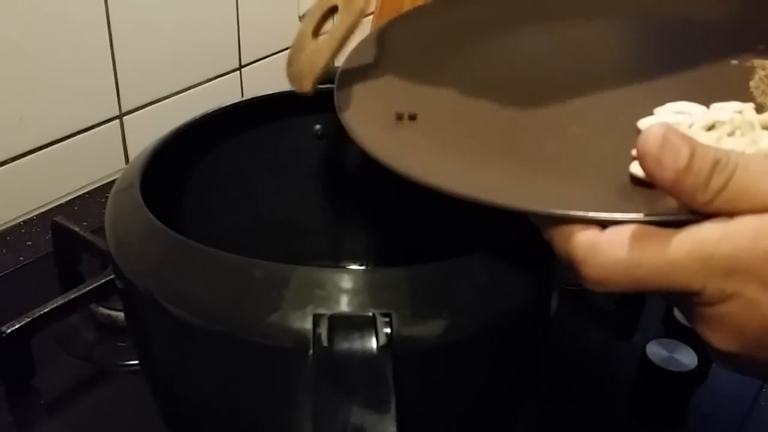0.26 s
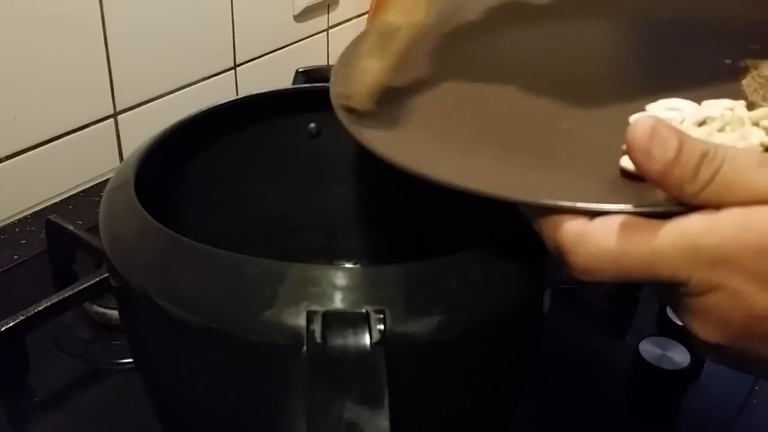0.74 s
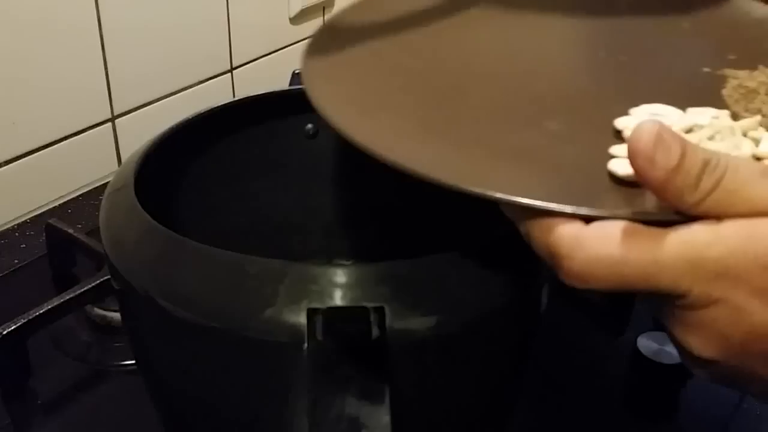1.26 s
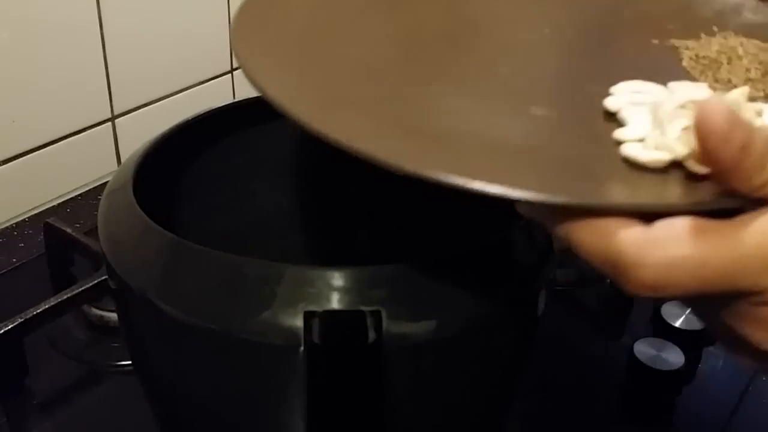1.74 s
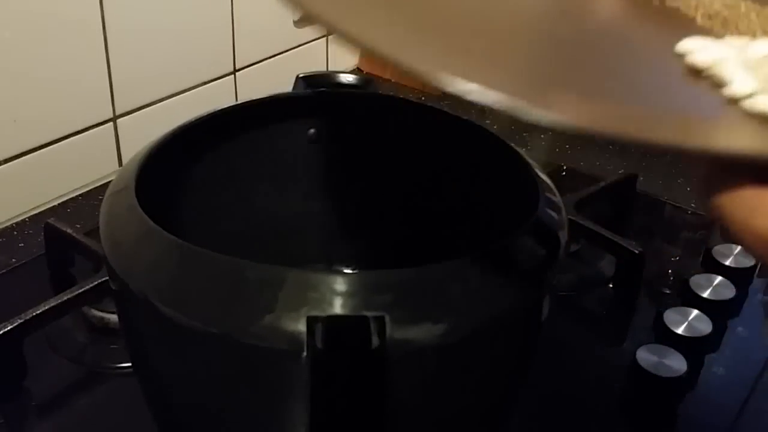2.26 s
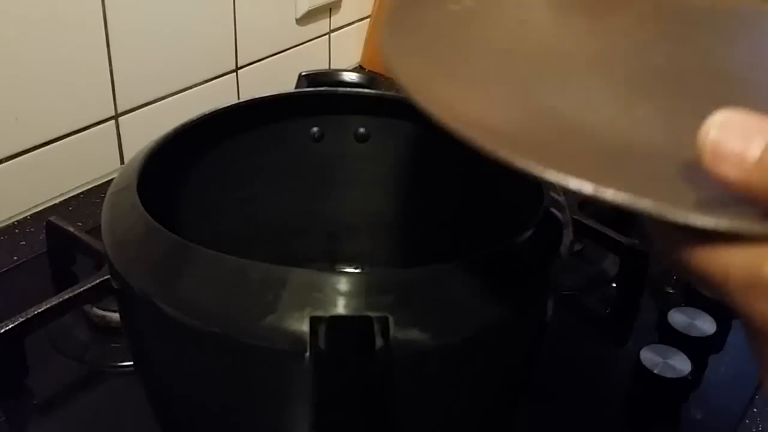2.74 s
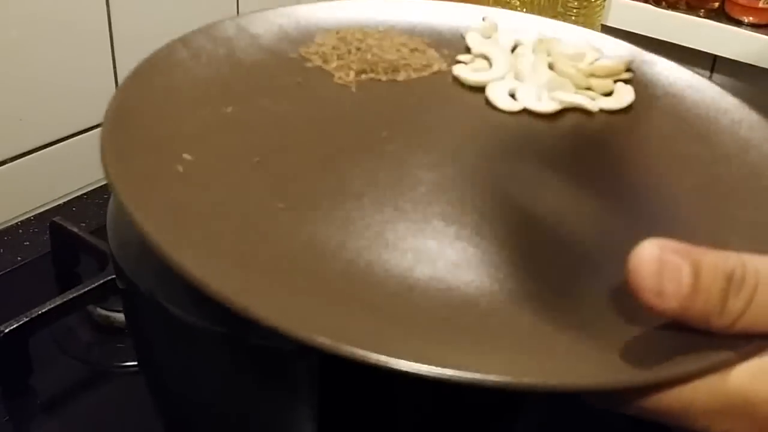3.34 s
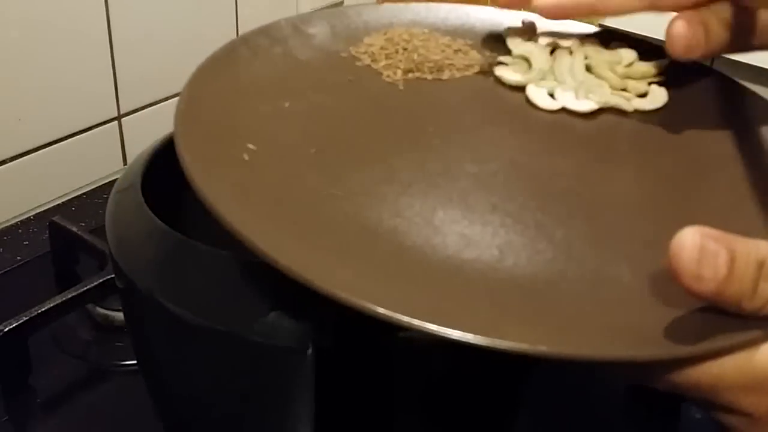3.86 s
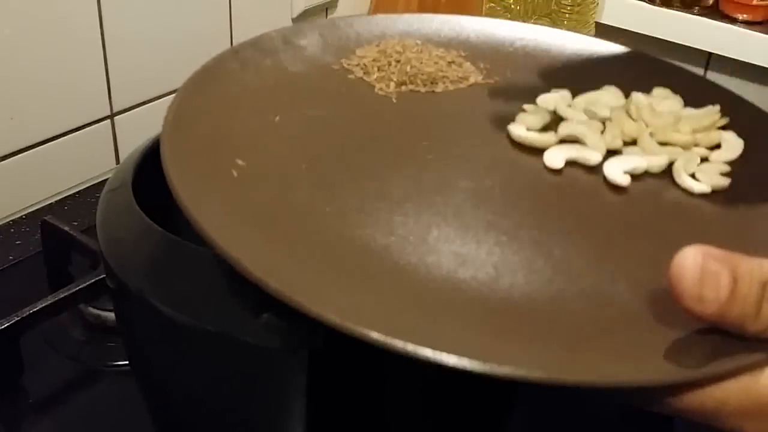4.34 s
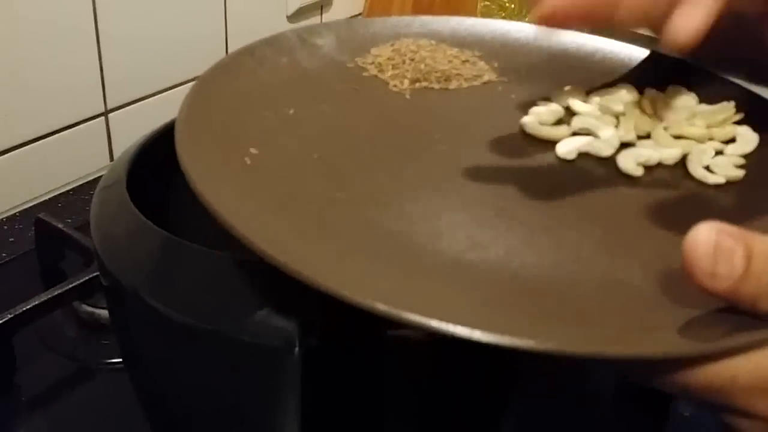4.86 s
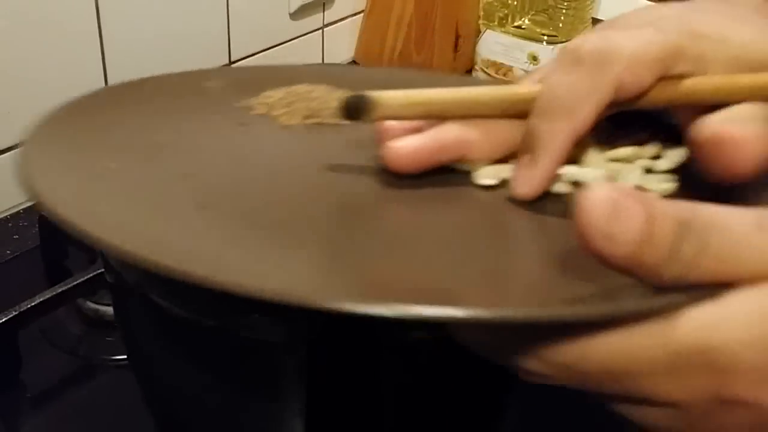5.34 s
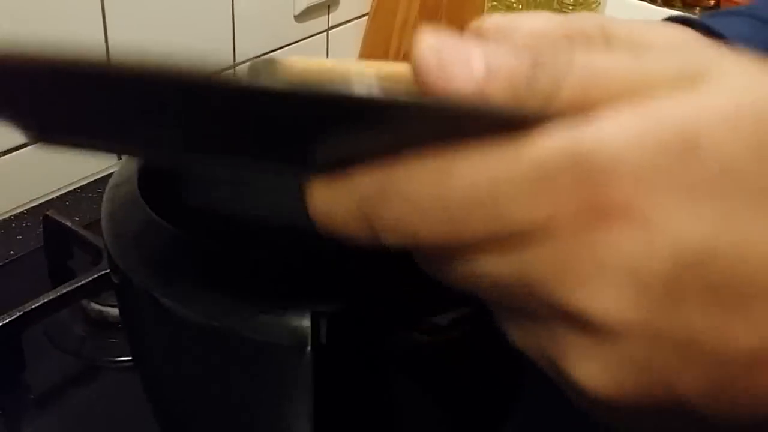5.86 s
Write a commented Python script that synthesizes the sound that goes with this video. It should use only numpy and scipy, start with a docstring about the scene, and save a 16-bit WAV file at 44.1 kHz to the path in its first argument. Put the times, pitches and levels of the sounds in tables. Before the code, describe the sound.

A soft fizz of frying oil with small pops and spits, light knocks on a stoneware plate and a faint gas burner.

```python
"""Whole spices fry gently in hot oil in a deep metal pot on a gas stove, in a tiled kitchen.
Tiny bubbles merge into a fine fizz; seeds pop and let out short jets of steam that ring in the pot.
A stoneware plate held above it is tapped and scraped by a wooden spoon and by nuts pushed across it.
Underneath lie the soft roar of the burner and a low hum."""
import sys
import numpy as np
from scipy import signal
from scipy.fft import rfft, irfft
from scipy.io import wavfile
from scipy.ndimage import uniform_filter1d

SR = 44100
rng = np.random.default_rng(int(sys.argv[2]) if len(sys.argv) > 2 else 0)


def store_wav(level_fs):
    """Save 16-bit WAV to argv[1]."""
    pcm = np.round(np.clip(np.atleast_2d(level_fs), -1, 1) * 32767)
    wavfile.write(sys.argv[1], SR, pcm.T.astype(np.int16))


N = 269010

# resonances of the air in the pot: f/Hz, width/Hz, lift/dB
POT_RESONANCES = [(438, 28, 6), (975, 49, 8.5), (1144.2, 37, 14), (1340.6, 23.8, 16), (1476, 69, 11),
                  (1570.3, 39, 15.5), (3634, 85, 5), (5000, 420, 2), (7820, 240, 5), (9240, 100, 3)]


def gain_of(db):
    return 10 ** (np.asarray(db) / 20)


def unit_rms(x):
    return x / np.sqrt(np.mean(x ** 2) + 1e-20)


def curve_at(points, hz):
    """Reads a curve along a logarithmic frequency axis."""
    f, value = np.transpose(points)
    return np.interp(np.log(hz + 1), np.log(f + 1), value)


def add(mix, start, sound):
    part = mix[..., round(start * SR):][..., :sound.shape[-1]]
    part += sound[..., :part.shape[-1]]


def high_pass(x, hz):
    return signal.sosfilt(signal.butter(4, hz, "high", fs=SR, output="sos"), x)


def resonate(x, hz, width):
    """A resonance that can glide: shifts hz down to zero, smooths with one pole, shifts back."""
    turn = np.exp(2j * np.pi * np.cumsum(hz * np.ones(x.shape[-1])) / SR)
    r = np.exp(-np.pi * width / SR)
    return 2 * (turn * signal.lfilter([1 - r], [1, -r], x / turn)).real


def ring(force, hz, t60):
    """One mode: a click of height 1 gives a dying sine of height 1."""
    r, turn = gain_of(-60 / t60 / SR), 2 * np.pi * hz / SR
    return signal.lfilter([0, r * np.sin(turn)], [1, -2 * r * np.cos(turn), r * r], force)


def swell(rise, hold, t60):
    """Time axis and an envelope that rises in a curve, holds, then dies away."""
    t = np.arange(SR * 2 // 5) / SR
    return t, np.minimum(t / rise, 1) ** 1.1 * gain_of(-60 * np.maximum(t - rise - hold, 0) / t60)


def clicks(size, per_s, spread_db):
    """Random clicks of either sign, most small and a few large."""
    chance, sign, height = rng.random((size, 3)).T
    return (chance < per_s / SR) * np.sign(sign - .5) * gain_of(-spread_db * np.log(height + 0.0033))


def hiss(colour, patchy_db, flicker_db):
    """A stereo noise bed coloured by the pot, with drifting patches and a flicker across all pitches."""
    # likeness of left and right: f/Hz, correlation
    stereo_likeness = [(60, 0.7), (300, 0.73), (900, 0.36), (1150, 0.58), (1300, -0.53), (1600, -0.45),
                       (1800, -0.38), (2300, 0.65), (2800, -0.05)]
    frames, hz = N // 256 + 5, np.fft.rfftfreq(1024, 1 / SR)
    a, b, c, d, patches = rng.standard_normal((frames, 513, 5)).T
    patches = unit_rms(uniform_filter1d(uniform_filter1d(patches, size=14, axis=0), size=10, axis=1))
    flicker = unit_rms(uniform_filter1d(rng.standard_normal(frames), size=6))
    pot_db = sum(db / (1 + (2 * (hz - f) / width) ** 2) for f, width, db in POT_RESONANCES)
    likeness = np.clip(curve_at(stereo_likeness, hz), -1, 1)[:, None]
    left = a + 1j * b
    right = likeness * left + np.sqrt(1 - likeness ** 2) * (c + 1j * d)
    level_db = (curve_at(colour, hz) + pot_db)[:, None] + patchy_db * patches + flicker_db * flicker
    spectra = np.array([left, right]) * gain_of(level_db)
    return unit_rms(signal.istft(spectra, nperseg=1024, noverlap=768)[1][:, :N])


def fizz():
    """Countless tiny bubbles merge into a hiss that swells with the frying; its treble comes and goes."""
    # spectrum of the fizz: f/Hz, level/dB
    colour = [(1060, -20), (1800, -5), (1900, -11), (2020, -9.5), (2810, -10), (3670, -6), (4470, -7),
              (4900, -5.5), (5500, -1.5), (6260, -6), (8640, -11), (9390, -12.5), (11200, -16),
              (14600, -47), (22000, -120)]
    # swell of the frying: t/s, level/dB
    levels = [(0.0, -51.5), (0.49, -52), (0.61, -52.5), (1.19, -53), (1.51, -54.5), (1.75, -53.5),
              (1.99, -49), (2.26, -52.5), (3.09, -52.5), (3.28, -54.5), (3.91, -53), (4.15, -47.5),
              (4.3, -53), (5.18, -51), (5.28, -49), (5.67, -51.5), (6.1, -47.5)]
    # brightness above 5 kHz: t/s, tilt/(dB per octave)
    tilts = [(0, -3), (.61, -1.5), (1.5, 1), (1.99, -2), (2.3, -1.5), (3.3, 0), (4.15, -3.5), (4.4, 0.5),
             (5.15, -3), (5.4, -1), (6.1, 2.5)]
    hz, t, spectra = signal.stft(hiss(colour, patchy_db=1.3, flicker_db=.4), SR, nperseg=512)
    octaves = np.log2(np.maximum(hz / 5000, 1))[:, None]
    level_db = np.interp(t, *np.transpose(levels))
    treble_db = octaves * np.interp(t, *np.transpose(tilts))
    return signal.istft(spectra * gain_of(level_db + treble_db), SR, nperseg=512)[1][:, :N]


def burner():
    """The gas flame gives a soft, flickering roar."""
    # spectrum of the roar: f/Hz, level/dB
    colour = [(76, -23), (130, -3), (290, -3), (387, -8.5), (473, -6.5), (578, -14.5), (752, -2.5),
              (885, -5.5), (1440, -4), (1900, -22.5), (2600, -17), (3380, -61), (5720, -120)]
    return gain_of(-59) * hiss(colour, patchy_db=1.63, flicker_db=1.0)


def hum():
    """A low, unsteady hum over a deep rumble of drifting air, nearly alike in both ears."""
    shared, left, right = rng.standard_normal((3, N))
    air = shared + 0.48 * np.array([left, right])
    tone = resonate(resonate(air, hz=105, width=20), hz=105, width=20)
    rumble = resonate(resonate(air, hz=58, width=45), hz=58, width=45)
    return gain_of(-71) * unit_rms(tone) + gain_of(-74.5) * unit_rms(rumble)


def bubbles(size, hz, width, per_s):
    """A crowd of bursting bubbles rings around one pitch; each ear hears mostly its own bubbles, with a few
    shared by both."""
    crowd = np.array([clicks(size, per_s, spread_db=3.) for _ in range(3)])
    ears = crowd[:2] + 0.27 * crowd[2]
    for _ in range(3):
        ears = resonate(ears, hz, width)
    return unit_rms(ears)


def spits(per_s=12, level_db=-63, t60=.15):
    """Small pockets of steam break the surface at random, each a faint, brief hiss at its own pitch."""
    out, t = np.zeros((2, N)), np.arange(3000) / SR
    for when, pitch, size in rng.random((round(per_s * N / SR), 3)):
        envelope = np.minimum(t / .004, 1) * gain_of(level_db + 6 * size - 60 * t / t60)
        add(out, when * N / SR, envelope * bubbles(len(t), 3500 + 6500 * pitch, width=1100, per_s=3200))
    return out


def pops_and_puffs():
    """Seed pops and short puffs of steam: each starts sharply, hisses for a moment and dies away."""
    # seed pops and steam puffs: t/s, level/dB, bubble f/Hz, width/Hz, hold/s, t60/s
    events = [(0.1074, -46.5, 4400, 2100, 0.0037, 0.16), (0.14, -45.5, 9600, 4700, .012, .11),
              (0.5862, -56, 7700, 4700, .006, .09), (0.8299, -37, 5200, 5730, .005, 0.25),
              (0.9668, -49.5, 4740, 4700, .01, 0.14), (1.105, -46, 4660, 2500, .012, .11),
              (1.2468, -52, 4900, 2900, .011, .13), (1.279, -55, 5300, 2900, 0.013, 0.33),
              (1.787, -39, 2680, 1970, 0.013, 0.15), (1.79, -48, 5800, 7000, 0.0078, 0.22),
              (1.8156, -41.5, 7300, 4900, .006, 0.18), (1.82, -57, 2580, 1400, .016, .09),
              (1.9113, -48.5, 4900, 1790, 0.014, 0.1), (1.952, -56, 4900, 1750, 0.024, 0.24),
              (2.022, -57.5, 9500, 2900, 0.043, 0.053), (2.0562, -51.5, 6900, 2300, .01, .12),
              (2.09, -41.5, 8170, 3200, 0.0085, 0.11), (2.2075, -51.5, 9600, 2900, 0.0064, 0.093),
              (2.822, -45, 8350, 3800, 0.012, 0.043), (2.845, -54.5, 9500, 2600, 0.029, 0.091),
              (3.0298, -38, 5050, 1720, 0.018, .04), (3.031, -53.5, 3270, 1520, 0.018, .06),
              (3.058, -49, 4900, 1500, 0.02, 0.11), (4.231, -55.5, 8000, 5900, 0.027, 0.43),
              (4.5626, -29, 4670, 1010, 0.0034, 0.13), (4.563, -39.5, 4230, 6740, 0.0074, 0.26),
              (4.591, -41, 6500, 2900, 0.02, 0.14), (5.151, -49.5, 4660, 900, 0.0088, 0.069),
              (5.283, -54.5, 7900, 1500, 0.011, 0.069)]
    out, t = np.zeros((2, N)), np.arange(12000) / SR
    attack = np.minimum(t / .0007, 1) * (1 + .7 * np.exp(-t / .005))
    for start, db, hz, width, hold, t60 in events:
        envelope = attack * gain_of(db - 60 * np.maximum(t - hold, 0) / t60)
        add(out, start, envelope * bubbles(len(t), hz, width, per_s=3500))
    return high_pass(out, 1800)  # small bubbles radiate no bass


def steam_jets(pitch_lift=.4, settle_s=0.0076, sputter_db=.7):
    """Steam escapes through the oil as a dense, broad spray of bubbles that sputters as it goes."""
    # jets of steam: t/s, rise/s, hold/s, t60/s, level/dB, centre f/Hz, low cut/Hz
    jets = [(0.135, 0.033, .004, 0.21, -35, 5500, 2070), (0.58, .003, 0.02, 0.25, -47.5, 6000, 3370),
            (5.13, 0.0074, 0.083, .1, -45.5, 6400, 3570), (5.239, 0.048, 0.037, 0.27, -52, 8300, 3600),
            (6.002, 0.045, .1, .3, -38, 5800, 3770)]
    out = np.zeros((2, N))
    for start, rise, hold, t60, db, hz, low_cut in jets:
        t, envelope = swell(rise, hold, t60)
        spray = bubbles(len(t), hz, width=10200, per_s=8000)
        glide_hz = hz * (1 + pitch_lift * np.exp(-t / settle_s))  # opens high and settles
        spray = high_pass(spray + .5 * unit_rms(resonate(spray, glide_hz, width=3700)), low_cut)
        sputter = unit_rms(uniform_filter1d(rng.standard_normal(len(t)), size=500))
        add(out, start, gain_of(db + sputter_db * sputter) * envelope * unit_rms(spray))
    return out


def plate():
    """Taps and the grit of scrapes ring the same modes, most those near the pitch of the contact."""
    # stoneware modes, damped by the hand that holds the plate: f/Hz, level/dB, t60/s
    modes = [(300, -6, .1), (447, 1, .14), (640, -5, .04), (810, -6, .05), (1125, -4, .07), (1240, -7, .06),
             (1400, -6, .06), (1940, -15, .06), (1972, -2, .12), (2400, -16, .04), (3255, -9, .05),
             (3305, -8, .07), (4715, 0, .04)]
    # blows of spoon and nuts: t/s, ring/dB, contact f/Hz, spread/octaves, knock/dB
    taps = [(.447, -35, 610, 0.69, -28.5), (0.45, -42, 1420, 0.25, -33), (.451, -33, 3060, 0.24, -47),
            (.455, -36.5, 1960, 0.56, -36), (.463, -49, 1310, 0.4, -31), (0.476, -44, 3060, 0.66, -36),
            (1.788, -42, 437, 0.28, -48), (1.79, -39.5, 1340, .54, -51), (3.954, -35, 3400, .33, -46),
            (3.978, -35, 3360, 0.34, -42), (4.06, -35, 3280, 1, -39), (4.11, -47, 4400, 0.63, -48),
            (4.3, -59, 1500, .39, -41), (4.325, -55, 2360, 0.18, -41), (4.958, -44, 3390, .3, -34.5),
            (4.963, -41, 3230, 0.33, -39.5)]
    # strokes: t/s, rise/s, hold/s, t60/s, grit/dB, contact f/Hz, rasp/dB, rasp f/Hz, rasp width/Hz
    scrapes = [(0.594, 0.025, 0.038, .05, -69, 5200, -47, 2040, 6200),
               (3.86, 0.077, 0.19, .03, -70, 2050, -61, 1260, 700),
               (3.933, .06, 0.166, .03, -69.5, 3460, -53.5, 1200, 503),
               (4.093, 0.045, 0.091, .2, -80, 268, -64, 300, 140)]
    out, t = np.zeros(N), np.arange(2000) / SR
    envelopes = [swell(*row[1:4])[1] for row in scrapes]
    grits = [env * unit_rms(clicks(len(env), per_s=4600, spread_db=6.0)) for env in envelopes]
    for hz, mode_db, t60 in modes:
        force = np.zeros(N)
        for (start, _, _, _, db, contact_hz, *_), grit in zip(scrapes, grits):
            add(force, start, gain_of(db - 12 * np.log2(hz / contact_hz) ** 2) * grit)
        for start, db, contact_hz, spread, _ in taps:
            add(force, start, gain_of([db - 6 * (np.log2(hz / contact_hz) / spread) ** 2]))
        out += gain_of(mode_db) * ring(force, hz, t60)
    for start, _, contact_hz, _, knock_db in taps:  # dry knock: wood and nuts are quickly damped
        add(out, start, gain_of(knock_db - 60 * t / 0.012) * np.sin(2 * np.pi * contact_hz * t))
    for (start, *_, rasp_db, hz, width), envelope in zip(scrapes, envelopes):
        rasp = resonate(resonate(rng.standard_normal(len(envelope)), hz, width), hz, width)
        add(out, start, gain_of(rasp_db) * envelope * unit_rms(rasp))
    return high_pass(out, 222)  # a small plate radiates no bass


def reflections(x, t60, predelay_s):
    """Sparse wall echoes of random sign, different for each channel, dying evenly."""
    echoes, slots = np.zeros((2, SR // 2)), np.arange(0, SR // 2 - 20, 20)
    arrivals = slots + rng.integers(0, 20, (len(slots), 2)).T
    np.put_along_axis(echoes, arrivals, rng.choice([-1., 1.], arrivals.shape), 1)
    t = np.arange(SR // 2) / SR
    echoes *= gain_of(-60 * t / t60) * (t >= predelay_s)
    echoes /= np.linalg.norm(echoes, axis=1)[:, None]
    return signal.fftconvolve(x * np.ones((2, 1)), echoes, axes=1)[:, :N]


def scene():
    """Oil and plate ring briefly in the tiled kitchen, over a bed of fizz, burner and hum."""
    oil = pops_and_puffs() + steam_jets() + spits()
    pot_ring = sum(resonate(oil, hz, width) for hz, width, _ in POT_RESONANCES[-4:])  # upper four only
    oil = oil + 0.39 * pot_ring
    dish = plate()
    near_walls = reflections(dish, t60=0.05, predelay_s=.001)
    close = oil + 0.5 * dish + 0.5 * near_walls
    room_send = gain_of(-10.5) * oil + gain_of(-8.5) * dish
    kitchen = reflections(room_send, t60=.35, predelay_s=0.0053)
    return close + kitchen + fizz() + burner() + hum()


def record(dry):
    """Each of the two microphones has its own colour; a steep high cut takes off the top."""
    # stereo balance: f/Hz, left minus right/dB
    balance = [(60, 1), (350, -5), (1200, -0.5), (1750, -4), (3000, -0.5), (4300, 1.5), (6000, 0),
               (7700, -9), (9500, -10.5), (11500, -4.5)]
    half_db = curve_at(balance, np.fft.rfftfreq(N, 1 / SR)) / 2
    coloured = irfft(rfft(dry) * gain_of([half_db, -half_db]), N)
    high_cut = signal.firwin(301, cutoff=11100, window=("kaiser", 7), fs=SR)
    return signal.oaconvolve(coloured, high_cut[None], "same")


dry = scene()
out = record(dry)
store_wav(out)
```